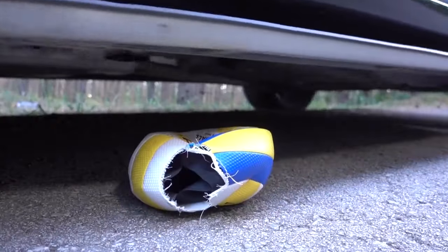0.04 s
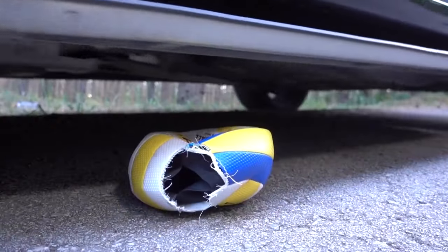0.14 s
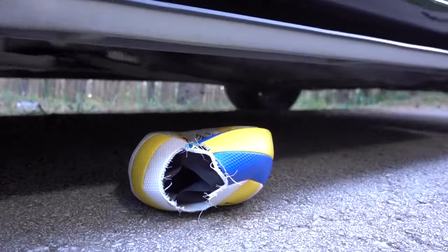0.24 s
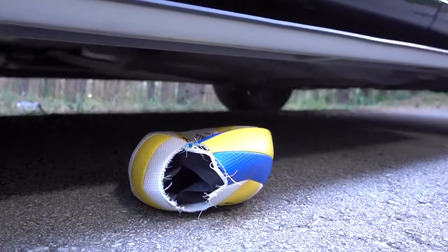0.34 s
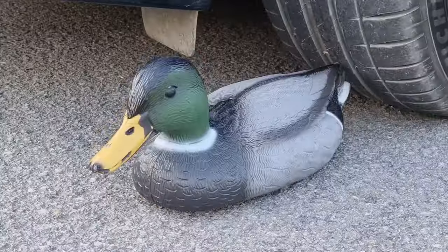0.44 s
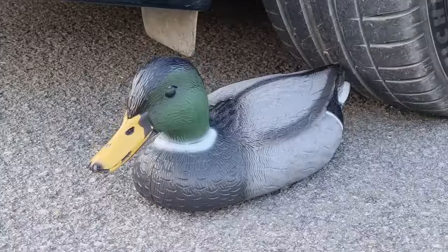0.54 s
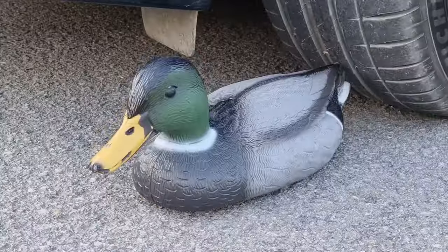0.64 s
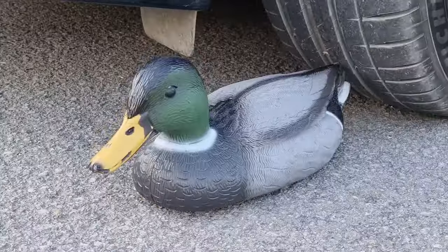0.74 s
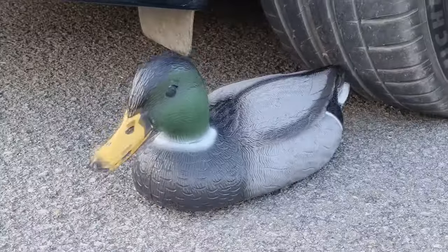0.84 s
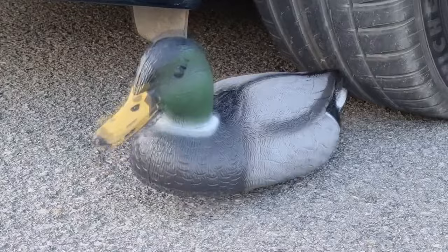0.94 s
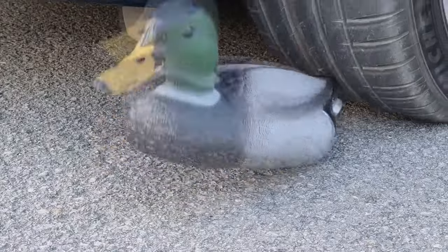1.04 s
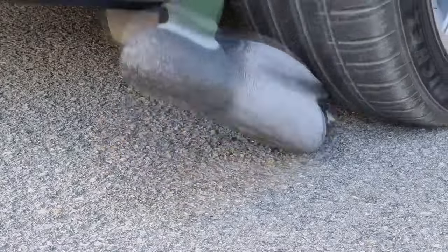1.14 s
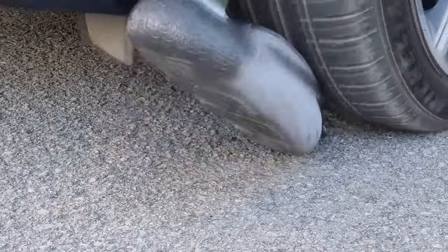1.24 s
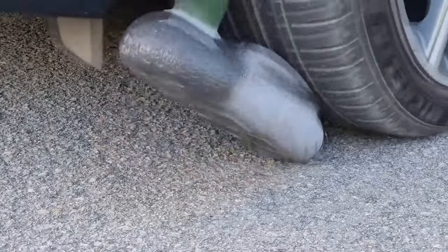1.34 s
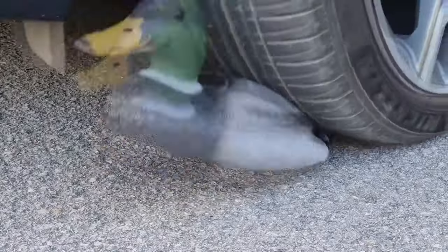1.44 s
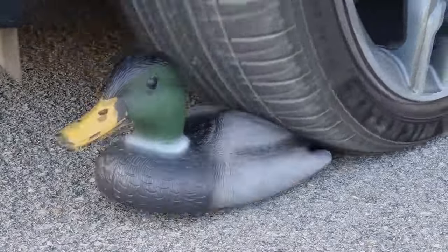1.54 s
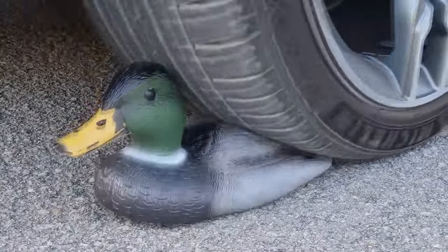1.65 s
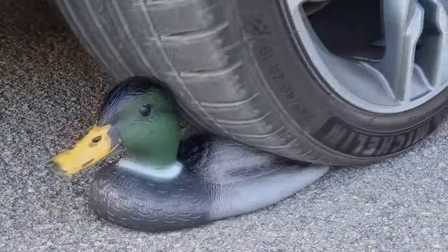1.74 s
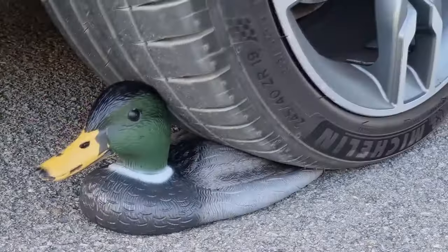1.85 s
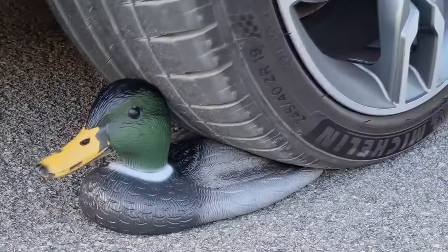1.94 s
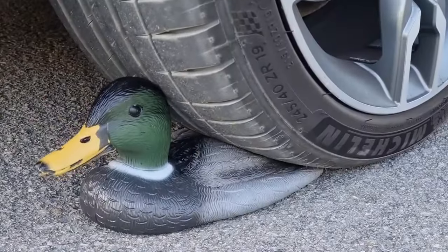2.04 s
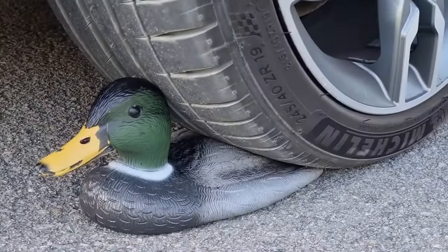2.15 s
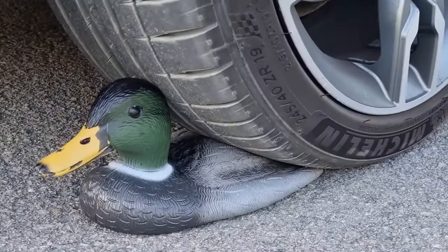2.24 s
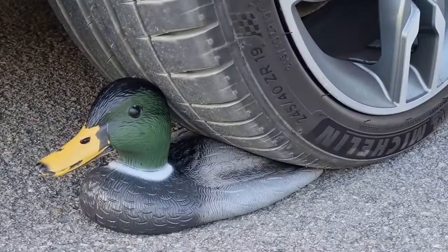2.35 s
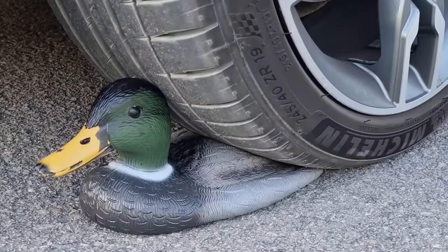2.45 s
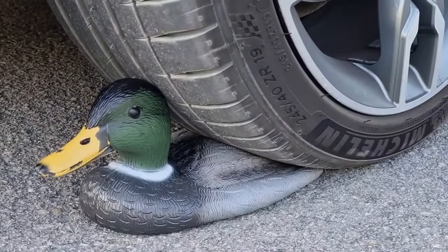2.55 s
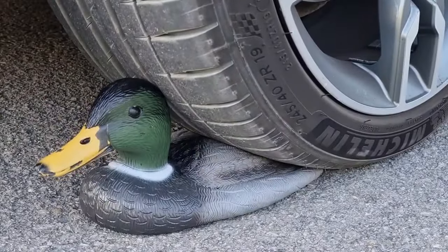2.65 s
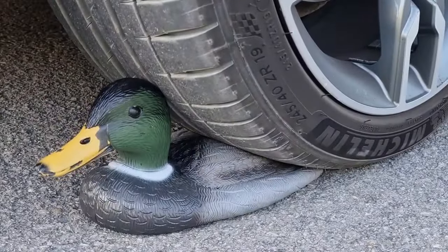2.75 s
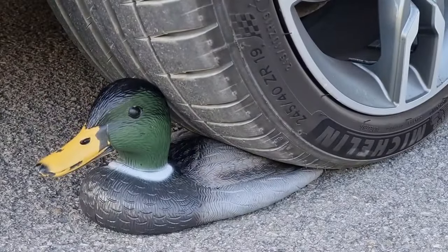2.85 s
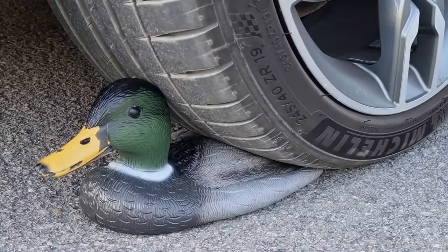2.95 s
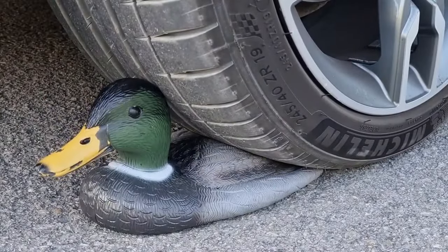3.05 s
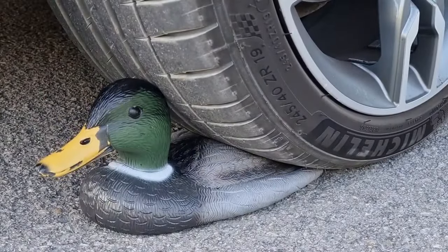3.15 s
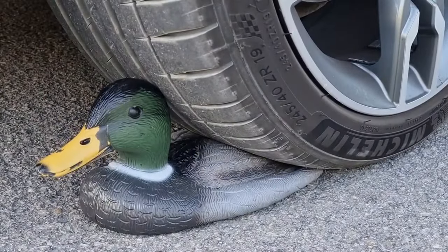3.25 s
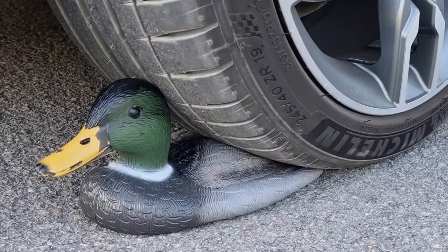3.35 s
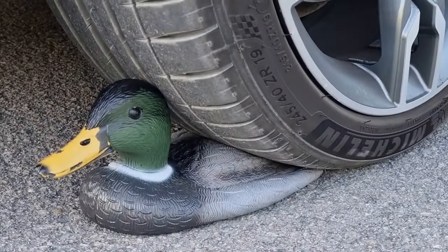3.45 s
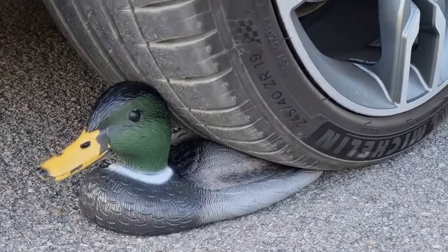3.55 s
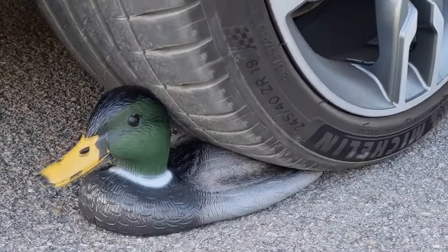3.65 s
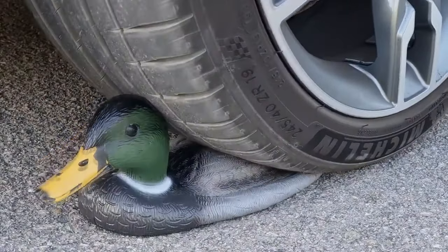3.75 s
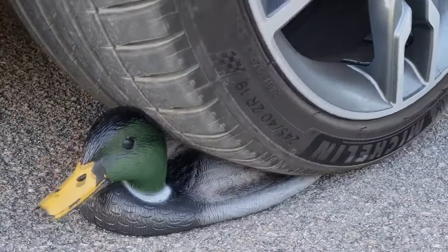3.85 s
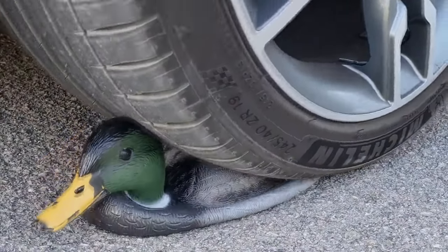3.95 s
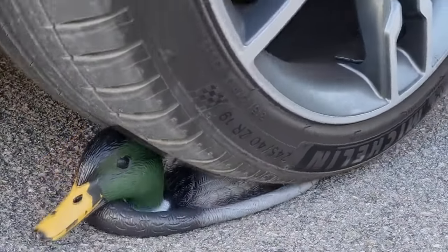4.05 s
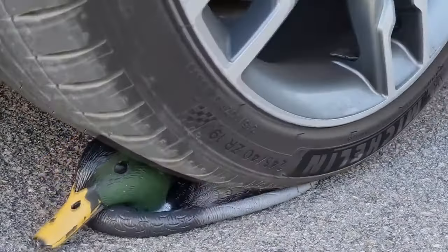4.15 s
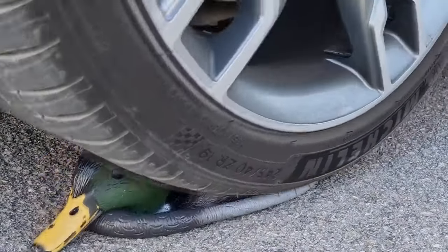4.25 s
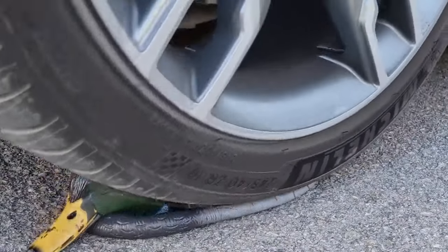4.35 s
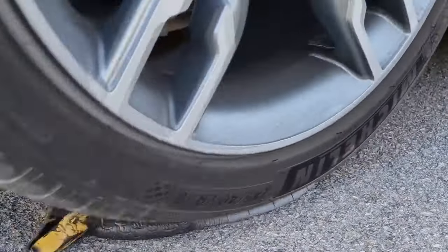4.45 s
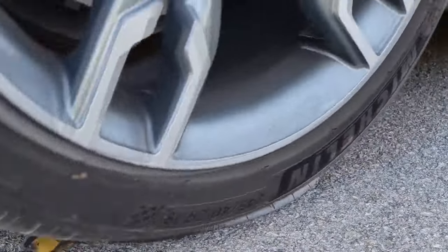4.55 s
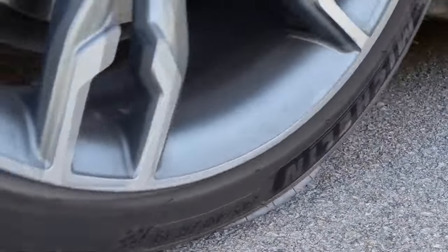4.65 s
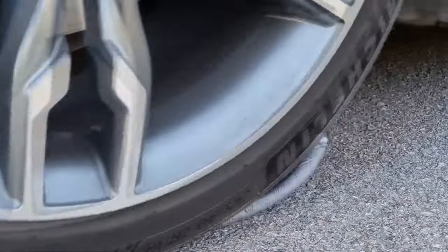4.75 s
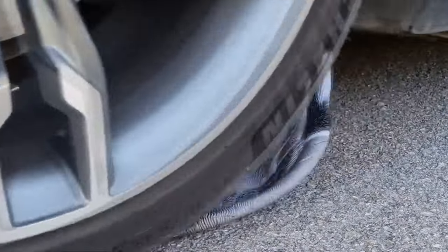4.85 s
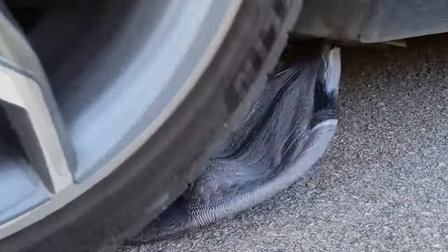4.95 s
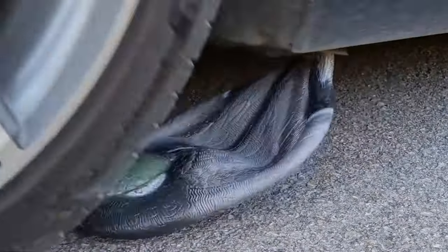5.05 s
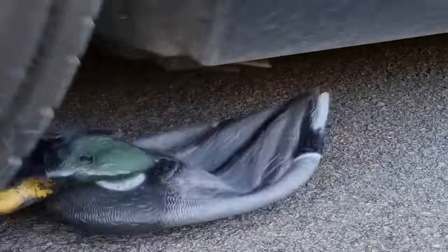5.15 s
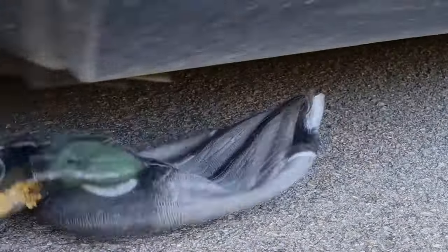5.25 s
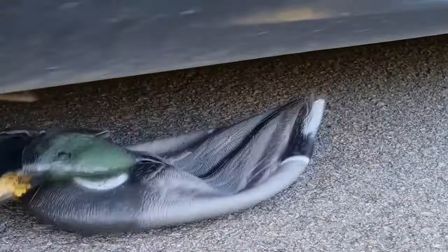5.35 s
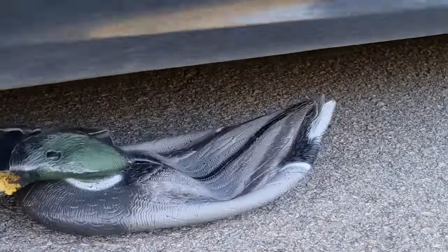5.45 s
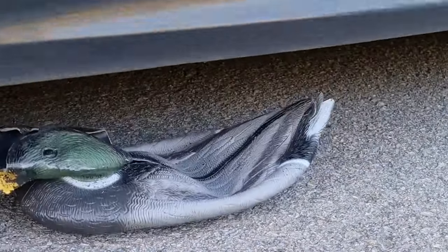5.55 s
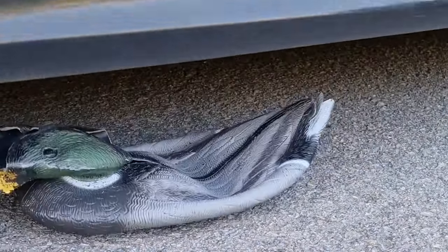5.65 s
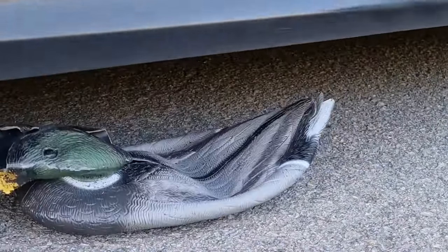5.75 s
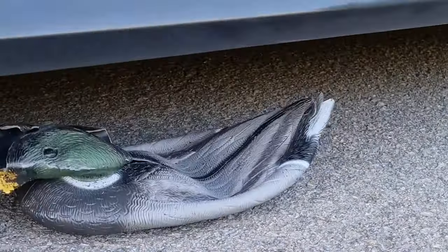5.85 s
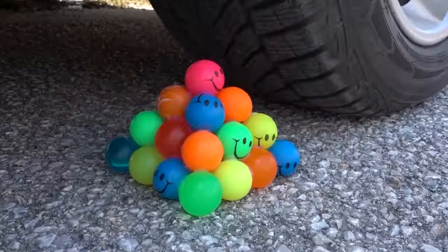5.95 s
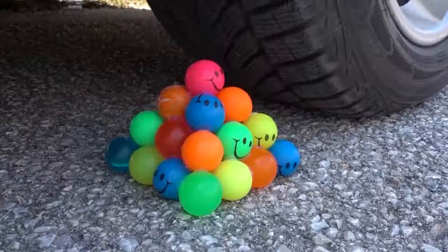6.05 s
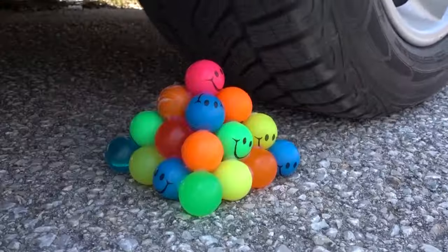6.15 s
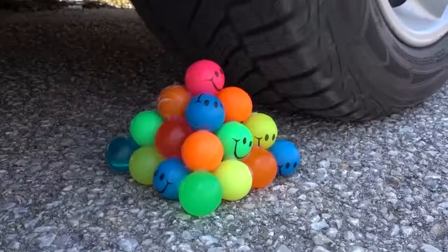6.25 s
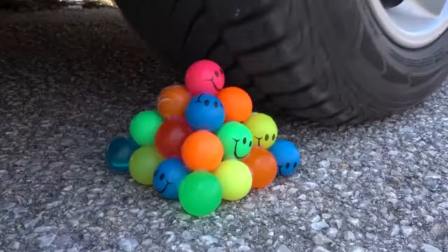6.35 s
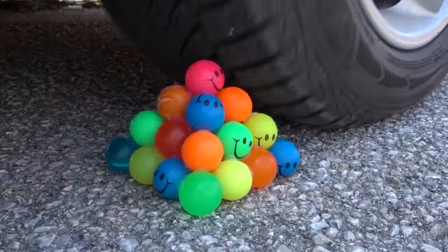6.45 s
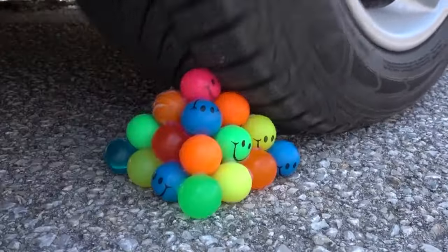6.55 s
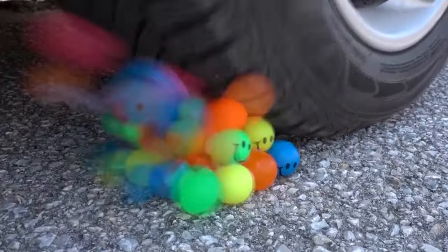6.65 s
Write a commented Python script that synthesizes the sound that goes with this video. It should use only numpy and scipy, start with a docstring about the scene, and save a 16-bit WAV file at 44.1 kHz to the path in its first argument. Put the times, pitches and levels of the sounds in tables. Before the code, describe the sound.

Close outdoor microphone near the road. Half a second of faint gritty tyre hiss cuts to low car rumble and plastic rubbing. A hollow plastic duck is tipped and squeezed with booming knocks, sharp cracks and a squeak; a quieter strained pause follows. Then the wheel climbs over it with loud snaps, hollow rings and thuds, and the flattened shell rattles lightly. A last cut brings quiet tyre grit and small balls tapping together.

```python
"""A gritty hiss of a car tyre on rough asphalt comes first, then a hollow plastic duck being run over, hard cut.
The duck's shell rubs, buckles and cracks: noise grains and sharp snaps drive resonances of air and wall.
Decaying sines make low hollow rings, short harmonic tones the squeaks; noise makes growls, rumble and thuds.
A last hard cut leads to a tyre creeping into a pile of small plastic balls, which scrape and knock together."""
import sys
import numpy as np
from scipy import signal
from scipy.fft import rfft, irfft, next_fast_len
from scipy.io import wavfile
from scipy.ndimage import map_coordinates

SR = 44100
rng = np.random.default_rng(int(sys.argv[2]) if len(sys.argv) > 2 else 0)


def master_out(mix):
    """Clip the mix to full scale and print it as 16-bit PCM to the path in sys.argv[1]."""
    frames = np.transpose(np.atleast_2d(mix))
    ceiling = np.clip(frames, -1, 1)
    pcm = np.round(ceiling * 32767).astype(np.int16)
    wavfile.write(sys.argv[1], SR, pcm)


N = 295470
TIME = np.arange(N) / SR
FIRST_CUT_S, SECOND_CUT_S = 0.515, 5.985

# The shell buckles or hits the road with a hollow knock; t60 is that of the driving chatter:
# start_s, hollow_hz, hollow_db, panel_hz, panel_db, crack_db, t60_s
SHELL_KNOCKS = [(1.179, 241, -41, 830, -44, -63, 0.065), (1.223, 220, -30, 710, -45.5, -63, 0.036),
                (1.318, 208, -28, 740, -41, -49.5, 0.79), (1.349, 190, -23.5, 572, -23.5, -32, 0.076),
                (1.664, 348, -21, 610, -30.5, -41.5, 0.033), (1.699, 400, -46, 634, -39, -40.5, 0.17),
                (1.748, 290, -41.5, 690, -35, -44.5, 0.025), (1.81, 256, -36.5, 530, -49, -64, 0.039),
                (1.837, 323, -39, 540, -43.5, -54, 0.024), (1.936, 243, -33.5, 630, -30.5, -40, 0.2),
                (4.056, 210, -43, 710, -44.5, -66, 0.031), (4.158, 388, -19.5, 644, -23.5, -41.5, 0.021),
                (4.2102, 485, -23.5, 575, -16, -39, 0.085), (4.701, 320, -40, 1030, -36, -46, 0.012),
                (5.069, 280, -27.5, 513, -33, -49, 0.13), (5.083, 191, -23, 460, -33.5, -49.5, 0.22),
                (5.135, 377, -34.5, 620, -36, -48.5, 0.22), (5.185, 241, -28, 760, -20.5, -40.5, 0.058),
                (5.203, 164, -30.5, 596, -25, -42.5, 0.24), (5.266, 276, -27.5, 684, -25, -43, 0.043)]
KNOCK_TREBLE_DB = -10  # relative to the crack
# The plastic splits; t60 is that of the driving chatter:
# start_s, crack_db, crack_pitch_ratio, tear_to_snap_ratio, treble_db, panel_hz, panel_db, t60_s
SHELL_CRACKS = [(1.418, -30.5, 1.23, 0.47, -41, 1800, -59, 0.011),
                (1.523, -21.5, 1.16, 0.53, -26.5, 720, -26.5, 0.027),
                (1.5643, -29, 0.79, 0.83, -31, 657, -21.5, 0.018),
                (1.601, -42, 1.1, 1.2, -35.5, 875, -61, 0.047),
                (2.443, -73, 1.5, 5, -59.5, 850, -58, 0.036),
                (3.8733, -21.5, 0.92, 1.2, -37, 1290, -23.5, 0.02),
                (4.2055, -32, 1.14, 4.2, -33.5, 553, -23.5, 0.056),
                (4.565, -18.5, 0.79, 2.1, -25, 1150, -16.5, 0.014),
                (4.8266, -45.5, 0.81, 1.1, -60, 714, -50, 0.029),
                (4.927, -36.5, 0.78, 0.58, -53.5, 810, -33.5, 0.042),
                (5.26, -32.5, 0.76, 0.88, -45, 650, -30, 0.041),
                (5.797, -52, 1.37, 3, -65, 870, -64, 0.0083)]
CRACK_HOLLOW_HZ, CRACK_HOLLOW_DB = 280, -8.5  # level relative to the panel
# The freed wreck rocks and taps the road: start_s, panel_hz, panel_db, crack_db
WRECK_TAPS = [(5.356, 585, -28, -38.5), (5.385, 620, -34.5, -47), (5.42, 596, -34, -46),
              (5.445, 645, -44.5, -68), (5.504, 487, -33, -47), (5.534, 480, -38, -57),
              (5.566, 675, -38.5, -56.5), (5.601, 554, -37.5, -68), (5.632, 680, -41, -54.5),
              (5.657, 740, -43, -60.5)]
TAP_HOLLOW_HZ, TAP_HOLLOW_DB = 313, -4  # level relative to the panel
TAP_TREBLE_DB, TAP_T60_S = -16.5, 0.058  # treble relative to the crack
HIT_S = .03  # each part of a hit has its energy stated as rms over this time
# Spectrum of a crack before its pitch ratio: pitch_hz, relative_level_db
CRACK_COLOUR = [(700, -47.5), (1600, 17), (3500, 20.5), (5000, 13), (7000, 0), (12000, -67)]
# Spectrum of the finest treble: pitch_hz, relative_level_db
FINE_HISS_COLOUR = [(2500, -8.5), (6500, -4.5), (10000, -9.5), (13000, -6), (16000, -8.5)]
# The dented body rings after a knock: pitch_hz, width_hz, level_db
BODY_RING_MODES = [(400, 100, -2.5), (691, 34, -8)]
# The split wall rings on: pitch_hz, width_hz, level_db
WALL_RING_MODES = [(1748, 86, 4.5), (2760, 12, -16.5), (3320, 12, -10), (3830, 56, -25.5), (6270, 390, -2)]

# The duck slides over grit: start_s, hold_s, rub_db, crunch_db
DUCK_SLIDES = [(0.706, 0.18, -44.5, -64.5), (1.073, 0.078, -48, -62.5), (1.193, 0.016, -46, -48),
               (1.521, 0.072, -35.5, -35), (1.668, 0.31, -41.5, -47), (2.143, 0.025, -44.5, -46),
               (2.374, 0.066, -57, -71), (2.79, 0.074, -56.5, -61.5), (3.502, 0.037, -42.5, -45),
               (3.648, 0.039, -54, -59.5), (4.031, 0.23, -53, -51.5)]
SLIDE_ATTACK_S, SLIDE_RELEASE_S = 0.044, 0.036  # time for 20 dB
SLIDE_HISS_DB = -10  # relative to the crunch
SLIP_UNEVEN_DB, SLIP_UNEVEN_PER_S = 2, 6.8  # the shell catches and lets go as it slides
# Short and longer swells of fine hiss: start_s, hold_s, level_db
HISS_SWELLS = [(1.41, 0.48, -47.5), (3.86, 0.023, -47), (4.06, 0.3, -58), (4.45, 0.27, -54)]
# The tread scrubs the dented body along in coarse jerks: start_s, hold_s, level_db
TREAD_SCRUBS = [(2.378, .085, -45), (3.505, 0.063, -38)]
# Shell resonances: pitch_hz, width_hz, level_db
SHELL_MODES = [(424, 98, -1.5), (710, 88, 1), (937, 110, -3), (1200, 190, 5.5), (1750, 81, 8),
               (2810, 160, 8)]
SMEAR_T60_S = .035
FLEX_SHARE, FLEX_PER_S = .03, 4  # how far and how fast the shell's resonances wander as it bends
# Spectrum of shell rubbing on road: pitch_hz, relative_level_db
RUB_COLOUR = [(120, -14.5), (220, 9.5), (420, 9), (650, 3), (1000, -0.5), (2000, -7), (3600, -18.5),
              (5000, -72.5)]
# Spectrum of grit crunching under the shell: pitch_hz, relative_level_db
CRUNCH_COLOUR = [(700, -39.5), (1500, 5.5), (3300, 9.5), (5500, -1.5), (15000, -33)]
# Spectrum of the tread straining on the asphalt: pitch_hz, relative_level_db
TREAD_COLOUR = [(300, 5), (850, 2), (1600, -5), (3400, -12.5), (7000, -30)]
# Hollow low growls of noise, one long, one very short: start_s, hold_s, level_db
HOLLOW_GROWLS = [(1.19, 0.24, -34.5), (1.53, 0.035, -37.5)]
GROWL_ATTACK_S, GROWL_RELEASE_S = .13, 0.02  # time for 20 dB
# Hollow resonances of the growl: pitch_hz, width_hz, level_db
GROWL_MODES = [(208, 14, 12.5), (418, 67, -1.5), (740, 145, -9.5)]
# Where the duck lies as it is shoved about: time_s, left_minus_right_db
DUCK_PAN = [(.85, 0.5), (1.38, -1), (1.55, 0), (4.6, -0.5), (4.93, -0.5), (5.9, -2)]

# Rubber slips on grit or plastic; pitch is mid-slip:
# start_s, length_s, pitch_hz, pitch_unsteadiness_share, step_per_overtone_db, level_db
RUBBER_SQUEAKS = [(0.277, 0.051, 867, 0.21, -9, -43), (0.682, 0.25, 433.7, 0.039, -3, -52),
                  (1.509, 0.026, 3300, 0.16, 10, -22.5), (2.133, 0.079, 1200, 0.023, -18, -49),
                  (2.139, 0.11, 602, 0.032, -6, -51), (3.103, 0.036, 2740, 0.5, -1, -63),
                  (3.164, 0.014, 1270, 0.22, -7.5, -58), (3.272, 0.04, 1070, 0.3, -5, -53),
                  (3.404, 0.028, 4200, 0.21, -10.5, -53.5), (3.674, 0.022, 1250, 0.347, -6, -52.5),
                  (4.196, 0.018, 3483, 0.385, -6, -24), (4.545, 0.033, 3260, 0.12, -4, -32),
                  (6.248, 0.031, 2700, 0.035, -6, -46.5), (6.624, 0.024, 2085, 0.134, -6, -41)]
# Low hollow tones ring and decay; level is before decay: start_s, level_db, t60_s
LOW_RINGS = [(1.316, -13, 0.25), (4.214, -26.5, 0.42), (4.612, -23.5, 0.55), (5.186, -21, 0.27)]
LOW_RING_HZ, LOW_RING_ATTACK_S = 210, .008
# A faint, wavering higher hollow tone lingers and dies away; level is before decay: # start_s, level_db, t60_s
HIGH_HUMS = [(4.22, -48.5, 1.7), (4.6, -46.5, 1.55)]
HUM_HZ = 614

# The balls shift and knock; t60 is that of the driving chatter: start_s, pitch_hz, knock_db, click_db, t60_s
BALL_KNOCKS = [(5.986, 424, -43, -70.5, 0.079), (6.254, 458, -36, -56, 0.046),
               (6.335, 740, -38, -37.5, 0.08), (6.421, 900, -39, -46.5, 0.27),
               (6.457, 885, -42, -47, 0.051), (6.5045, 825, -36, -42, 0.033), (6.528, 533, -37, -59, 0.079),
               (6.556, 1120, -37.5, -46.5, 0.073), (6.572, 815, -49, -56, 0.041),
               (6.587, 760, -38.5, -46, 0.017), (6.632, 1440, -39.5, -65, 0.013)]
BALL_HOLLOW_HZ, BALL_HOLLOW_DB = 378, -8  # level relative to the knock
BALL_TREBLE_DB = -11  # relative to the click
# Ball resonances: pitch_hz, width_hz, level_db
BALL_MODES = [(760, 40, 6), (2580, 250, -25)]
# The pile scrapes along the road: start_s, hold_s, level_db
PILE_SHOVES = [(6.53, 0.032, -38)]
# Spectrum of grit under tread and balls: pitch_hz, relative_level_db
GRIT_COLOUR = [(200, -7.5), (800, 7.5), (3200, -3), (12000, -45.5)]
# The tyre slows as it nears the balls: time_s, rumble_db, grit_db, hiss_db
BALL_ROLL = [(6.0, -37, -63.5, -67), (6.1, -42.5, -62, -70.5), (6.3, -46.5, -53, -65.5),
             (6.39, -59, -54.5, -55.5), (6.7, -53, -54.5, -53.5)]
# Spectrum of that rolling rumble: pitch_hz, relative_level_db
ROLL_COLOUR = [(25, -13.5), (120, 3.5), (300, -8.5), (1200, -29.5), (3000, -54)]

# The car's low rumble and the grit straining under its tread: time_s, rumble_db, grit_db
CAR_LEVELS = [(.55, -39, -73.5), (.68, -47.5, -64), (.97, -41, -58), (1.5, -44, -46.5), (2.05, -36, -52.5),
              (2.3, -37.5, -55.5), (3.0, -34, -73), (3.38, -39, -60.5), (3.75, -30, -54.5),
              (4.4, -46.5, -55.5), (4.75, -39.5, -52), (5.0, -55.5, -52.5), (5.45, -46.5, -43),
              (5.95, -46, -55.5)]
GRIT_HISS_DB = -21.5  # relative to the grit level
RUMBLE_UNEVEN_DB, RUMBLE_UNEVEN_PER_S = 2, 7
# Spectrum of the car's rumble: pitch_hz, relative_level_db
RUMBLE_COLOUR = [(22, -6.5), (45, 2.5), (80, 7.5), (130, -2), (280, -20), (1000, -56.5)]
# Soft low thuds and swells of low noise: start_s, hold_s, level_db
LOW_THUDS = [(.92, 0.065, -43), (1.35, 0.045, -44), (1.94, 0.08, -29), (3.5, 0.02, -36.5),
             (4.572, 0.027, -21.5), (5.075, 0.018, -35), (5.205, 0.019, -21.5)]
THUD_ATTACK_S, THUD_RELEASE_S = 0.034, 0.057  # time for 20 dB
# Spectrum of the thuds: pitch_hz, relative_level_db
THUD_COLOUR = [(22, -9), (45, -7), (85, 9.5), (140, -2), (280, -13), (1000, -59.5)]
# Spectrum of the opening roll: pitch_hz, relative_level_db
OPENING_COLOUR = [(25, -38), (85, -12.5), (140, -18.5), (220, -10), (850, -18), (6000, -30), (14000, -31),
                  (16000, -39)]
OPENING_DB = -40
# How alike left and right are, from -1 opposite to 1 identical: pitch_hz, likeness
STEREO_LIKENESS = [(30, -0.14), (160, 0.94), (350, 0.85), (800, 0.43), (2000, 0.12), (12000, -0.3)]
CUTOFF_HZ = 16000


def knocks():
    """Dull blows: mostly enclosed air and panel, with a short ring of the body."""
    rows = [(s, hollow_hz, hollow_db, panel_hz, panel_db, crack_db, crack_db + KNOCK_TREBLE_DB, t60)
            for s, hollow_hz, hollow_db, panel_hz, panel_db, crack_db, t60 in SHELL_KNOCKS]
    blows = hits(rows, scatter=1.0, crack_scatter=6.1, hollow_width=0.44, panel_width=0.26, crack_life=0.76)
    return blows + resonances(blows, BODY_RING_MODES)


def cracks():
    """Sharp splits, from one clean snap to a ragged tear, that leave the wall ringing."""
    splits = np.zeros((2, N))
    for s, crack_db, pitch, ragged, treble_db, panel_hz, panel_db, t60 in SHELL_CRACKS:
        hollow_db = panel_db + CRACK_HOLLOW_DB
        row = (s, CRACK_HOLLOW_HZ, hollow_db, panel_hz, panel_db, crack_db, treble_db, t60)
        splits += hits([row], scatter=0.92, crack_scatter=ragged, hollow_width=0.97, panel_width=0.31,
                       crack_life=1.0, crack_pitch=pitch)
    return splits + resonances(splits, WALL_RING_MODES)


def rocking():
    """The freed wreck taps the road: each tap drives its air and panel, with a very short crack."""
    rows = [(s, TAP_HOLLOW_HZ, panel_db + TAP_HOLLOW_DB, panel_hz, panel_db,
             crack_db, crack_db + TAP_TREBLE_DB, TAP_T60_S)
            for s, panel_hz, panel_db, crack_db in WRECK_TAPS]
    return hits(rows, scatter=1.1, crack_scatter=3, hollow_width=0.27, panel_width=0.36, crack_life=0.23)


def hits(rows, scatter, crack_scatter, hollow_width, panel_width, crack_life, crack_pitch=1):
    """A wall snaps over and chatters to rest; this drives the enclosed air, the panel and a bright crack."""
    out, t = np.zeros((2, N)), TIME[:SR // 4]
    crack_colour = np.multiply(CRACK_COLOUR, [crack_pitch, 1])
    for s, hollow_hz, hollow_db, panel_hz, panel_db, crack_db, treble_db, t60 in rows:
        chatter = spread(rng.standard_normal((2, len(t))) * from_db(2.7 * drift(170, size=len(t))))
        snap = np.zeros((2, len(t)))
        snap[0, 0] = snap[1, 2] = np.sqrt(len(t))  # the right side comes two samples later
        # the push moves the whole wall; the tear is its sharper, more ragged part
        push = snap + scatter * rms_one(chatter * from_db(-60 * t / t60))
        tear = snap + crack_scatter * rms_one(chatter * from_db(-60 * t / (t60 * crack_life)))
        hollow = resonance(push, hollow_hz, hollow_width * hollow_hz)
        hollow = band(hollow, 0.12 * hollow_hz, 1.12 * hollow_hz)
        panel = resonance(push, panel_hz, panel_width * panel_hz)
        panel = band(panel, 0.31 * panel_hz, 1.85 * panel_hz)
        crack = coloured(tear, crack_colour)
        treble = coloured(tear, FINE_HISS_COLOUR)
        parts = [(hollow, hollow_db), (panel, panel_db), (crack, crack_db), (treble, treble_db)]
        hit = sum(from_db(db) * rms_one(part) for part, db in parts)
        add(out, s, hit * np.sqrt(HIT_S / t[-1]))
    return out


def friction():
    """Uneven slips shake the shell as it rubs; grit crunches and hisses under shell and tread."""
    _, road = gains_in_time(CAR_LEVELS)
    rub, crunch, hiss = friction_gains()
    slips = grains(per_s=700, size_db=4.0, smooth=.6)
    shell = rms_one(flexing(resonances(smeared(slips), SHELL_MODES)))
    smeared_rub = flexing(smeared(slips))
    grit = grains(per_s=600, size_db=3.2, smooth=.9)
    fine_grit = grains(per_s=5000, size_db=1, smooth=0.3)
    catching = rms_one(from_db(SLIP_UNEVEN_DB * drift(SLIP_UNEVEN_PER_S)))
    sound = catching * rub * coloured(2.2 * smeared_rub + shell, RUB_COLOUR)
    sound += crunch * coloured(grit + 0.25 * shell, CRUNCH_COLOUR)
    sound += scrubs()
    sound += road * coloured(grit, TREAD_COLOUR)
    hiss = np.hypot(hiss, from_db(GRIT_HISS_DB) * road)  # the two hisses add as power
    return sound + hiss * coloured(fine_grit, FINE_HISS_COLOUR)


def friction_gains():
    """Rub and crunch gains of the slides, and the hiss gain of slides and hiss swells."""
    rub_rows = [(s, hold, db) for s, hold, db, _ in DUCK_SLIDES]
    crunch_rows = [(s, hold, db) for s, hold, _, db in DUCK_SLIDES]
    rub = swells(rub_rows, SLIDE_ATTACK_S, SLIDE_RELEASE_S)
    crunch = swells(crunch_rows, SLIDE_ATTACK_S, SLIDE_RELEASE_S)
    hiss_swells = swells(HISS_SWELLS, attack_s=0.067, release_s=0.095)
    return rub, crunch, from_db(SLIDE_HISS_DB) * crunch + hiss_swells


def scrubs():
    """Sparse, uneven slips, smeared and coloured like the rub."""
    jerks = band(smeared(grains(per_s=400, size_db=2.5, smooth=.2)), 290, 3600)
    return swells(TREAD_SCRUBS, SLIDE_ATTACK_S, SLIDE_RELEASE_S) * coloured(jerks, RUB_COLOUR)


def smeared(x):
    """A short burst of decaying noise smears the rub and colours it."""
    t = TIME[:SR // 8]
    burst = rng.standard_normal(len(t)) * from_db(-60 * t / SMEAR_T60_S)
    return rms_one(signal.oaconvolve(x, burst[None], axes=1)[:, :N])


def flexing(x):
    """All resonances of a steady sound wander together as the shell bends: it is read at a varying speed."""
    place = np.cumsum(1 + FLEX_SHARE * drift(FLEX_PER_S)) % (N - 1)
    return np.array([map_coordinates(side, [place], mode="nearest") for side in x])


def growls():
    """Hollow low growls: noise through a few low resonances."""
    hollow = resonances(spread(rng.standard_normal((2, N))), GROWL_MODES)
    return swells(HOLLOW_GROWLS, GROWL_ATTACK_S, GROWL_RELEASE_S) * rms_one(band(hollow, 110, 890))


def squeaks(flutter_db, sag):
    """Stick-slip gives a short harmonic tone that sags as the strain eases; when very unsteady, a scuff."""
    out = np.zeros((2, N))
    for s, length, hz, unsteady, overtone_db, db in RUBBER_SQUEAKS:
        size = int(length * SR)
        wobble, flutter = drift(740, size=SR)[:size], drift(80, size=SR)[:size]
        sagging_hz = hz * np.linspace(1 + sag, 1 - sag, size)
        phase = 2 * np.pi * np.cumsum(sagging_hz * (1 + unsteady * wobble + .012 * flutter)) / SR
        # the left-right phase difference of a partial grows with its pitch
        partials = [from_db(overtone_db * k) * np.sin(k * phase + k * hz / 4500 * np.array([[1], [-1]]))
                    for k in range(1, 7) if k == 1 or k * hz < 4000]
        tone = sum(partials) * from_db(flutter_db * flutter) * signal.windows.tukey(size, .7)
        add(out, s, from_db(db) * rms_one(tone))
    return out


def hollow_rings():
    """Low hollow tones ring and decay as sines; a higher hollow tone wavers and dies away."""
    out, t = np.zeros((2, N)), TIME[:SR]
    ring = np.sin(2 * np.pi * LOW_RING_HZ * t) * np.minimum(t / LOW_RING_ATTACK_S, 1)
    for s, db, t60 in LOW_RINGS:
        add(out, s, from_db(db - 60 * t / t60) * ring)
    for s, db, t60 in HIGH_HUMS:
        hum = np.sin(2 * np.pi * HUM_HZ * t + .5 * drift(19, size=SR))
        hum = rms_one(hum * from_db(2 * drift(22, size=SR)))
        add(out, s, from_db(db - 60 * t / t60) * hum)
    return out


def car_rumble():
    """Low noise for the car's rumble swells unevenly; the same noise makes soft low thuds and swells."""
    car, _ = gains_in_time(CAR_LEVELS)
    lumps = rms_one(from_db(RUMBLE_UNEVEN_DB * drift(RUMBLE_UNEVEN_PER_S)))
    low_noise = spread(rng.standard_normal((2, N)))
    thuds = swells(LOW_THUDS, THUD_ATTACK_S, THUD_RELEASE_S)
    return car * lumps * coloured(low_noise, RUMBLE_COLOUR) + thuds * coloured(low_noise, THUD_COLOUR)


def crushed_duck():
    """Buckling shell, growls and friction on grit, with hollow rings, echoes and the rumble of the car."""
    blows = knocks() + cracks() + rocking()
    left, = gains_in_time(DUCK_PAN)
    duck = (blows + friction() + growls()) * np.sqrt([left, 1 / left])
    echoes = from_db(-12.0) * underbody(blows, t60=0.079) + from_db(-27) * underbody(blows, t60=0.33)
    return duck + hollow_rings() + echoes + car_rumble()


def ball_taps():
    """Small hollow balls knock together: air, wall and a click for each contact."""
    rows = [(s, BALL_HOLLOW_HZ, db + BALL_HOLLOW_DB, hz, db, click_db, click_db + BALL_TREBLE_DB, t60)
            for s, hz, db, click_db, t60 in BALL_KNOCKS]
    return hits(rows, scatter=1.15, crack_scatter=5.6, hollow_width=0.5, panel_width=0.55, crack_life=1.0)


def nudged_balls():
    """The tread rolls on grit and nudges the pile, which scrapes, taps and resonates."""
    rumble, grit, hiss = gains_in_time(BALL_ROLL)
    road = rumble * coloured(spread(rng.standard_normal((2, N))), ROLL_COLOUR)
    road += hiss * rms_one(band(rng.standard_normal((2, N)), 2240, 11000))
    shove = swells(PILE_SHOVES, attack_s=0.076, release_s=0.091)
    scrape = (grit + shove) * coloured(grains(per_s=900, size_db=5.0, smooth=0.5), GRIT_COLOUR)
    pile = (scrape + ball_taps()) * panned(1.9)
    ring = from_db(-17.0) * resonances(pile, BALL_MODES)
    return road + pile + ring + from_db(-13.5) * underbody(pile, t60=0.13)


def opening_roll():
    """A steady gritty hiss of the car creeping over asphalt: dense grains over smooth noise."""
    return from_db(OPENING_DB) * coloured(grains(per_s=1500, size_db=2.5, smooth=2), OPENING_COLOUR)


def underbody(x, t60):
    """Short, dull reflections between road and car floor, as decaying noise."""
    t = TIME[:SR // 3]
    echoes = band(rng.standard_normal((2, len(t))), 120, 10000)
    echoes = echoes * from_db(-60 * t / t60) * (t > .004)  # silent for the first 4 ms
    return signal.oaconvolve(x, rms_one(spread(echoes)) / np.sqrt(len(t)), axes=1)[:, :N]


def grains(per_s, size_db, smooth):
    """Clumped slips of uneven size over a share of smooth friction noise."""
    born = rng.random(N) < per_s * from_db(4 * drift(25)) / SR
    sizes = born * from_db(size_db * np.minimum(rng.exponential(1, N), 3.5))
    slips = rms_one(sizes * rng.standard_normal((2, N)))
    return rms_one(spread(slips + smooth * rng.standard_normal((2, N))))


def resonances(x, modes):
    """What a hollow body's modes give back, signs alternating."""
    return sum((-1) ** k * from_db(db) * resonance(x, hz, width) for k, (hz, width, db) in enumerate(modes))


def resonance(x, hz, width_hz):
    """Two-pole resonance with gain close to 1 on top."""
    r = np.exp(-np.pi * width_hz / SR)
    zeros = np.array([1, 0, -1]) * (1 - r * r) / 2
    return signal.lfilter(zeros, [1, -2 * r * np.cos(2 * np.pi * hz / SR), r * r], x)


def band(x, low_hz, high_hz):
    """Gentle band-pass."""
    edges = [low_hz, min(high_hz, .45 * SR)]
    return signal.sosfilt(signal.butter(2, edges, "band", fs=SR, output="sos"), x)


def coloured(x, spectrum):
    """Causal (minimum-phase) filter with the given spectrum, then rms 1."""
    size = 2048
    log_gain = at_hz(spectrum, np.arange(size + 1) * SR / (2 * size)) * np.log(10) / 20
    cepstrum = irfft(log_gain)
    cepstrum[1:size] *= 2  # folding the cepstrum forward makes the filter minimum-phase
    cepstrum[size + 1:] = 0
    response = irfft(np.exp(rfft(cepstrum)))
    return rms_one(signal.oaconvolve(x, response[None], axes=1)[:, :x.shape[1]])


def spread(pair):
    """Two unrelated signals become left and right: alike in the low mids, apart in the treble."""
    size = next_fast_len(pair.shape[1])
    mid, side = rfft(pair, size)
    alike = np.clip(at_hz(STEREO_LIKENESS, np.arange(len(mid)) * SR / size), -.99, .99)
    sides = np.sqrt(1 + alike) * mid + np.sqrt(1 - alike) * side * [[1], [-1]]
    return irfft(sides, size)[:, :pair.shape[1]] / np.sqrt(2)


def leaning(x, hz, width_hz, db):
    """Around one pitch the left is louder than the right by db (negative: quieter)."""
    return x + (panned(db) - 1) * resonance(x, hz, width_hz)


def panned(db):
    """Left and right gains that differ by db."""
    return from_db(np.array([[db], [-db]]) / 2)


def swells(rows, attack_s, release_s):
    """Summed gain of (start, hold, dB) events; each moves 20 dB in the attack and release times."""
    gain = 0
    for s, hold, db in rows:
        away = np.maximum((s - TIME) / attack_s, (TIME - s - hold) / release_s)
        gain = gain + from_db(db - 20 * np.clip(away, 0, 10))
    return gain


def gains_in_time(rows):
    """One gain curve for each dB column."""
    s, *columns = np.transpose(rows)
    return [from_db(np.interp(TIME, s, c)) for c in columns]


def drift(rate, size=N):
    """Smooth chance with spread near 1, made at a fortieth of the sample rate."""
    r = np.exp(-80 * np.pi * rate / SR)
    noise = rng.standard_normal(size // 40 + 2002)
    slow = signal.lfilter([1], [1, -2 * r, r * r], noise)[2000:]  # skip the filter's start
    return np.interp(np.arange(size) / 40, np.arange(len(slow)), rms_one(slow))


def at_hz(points, hz):
    """Read a table on a log-frequency axis."""
    points = np.array(points)
    return np.interp(np.log(hz + 1), np.log(points[:, 0]), points[:, 1])


def from_db(db):
    """Decibels to gain."""
    return 10 ** (np.asarray(db) / 20)


def rms_one(x):
    """Scale to rms 1."""
    return x / np.sqrt(np.mean(x ** 2) + 1e-20)


def add(out, s, sound):
    """Mix a sound in at time s."""
    start = int(round(s * SR))
    out[:, start:start + sound.shape[-1]] += sound[..., :N - start]


def scene():
    """Opening roll, crushed duck and nudged balls follow each other with hard cuts; squeaks run through all."""
    squeals = squeaks(flutter_db=3.0, sag=0.029)
    opening = opening_roll() + squeals
    duck = leaning(crushed_duck() + squeals, hz=3300, width_hz=790, db=-4.0)
    balls = leaning(nudged_balls() + squeals, hz=2360, width_hz=2700, db=8.0)
    return np.where(TIME < FIRST_CUT_S, opening, np.where(TIME < SECOND_CUT_S, duck, balls))


def record(dry):
    """The highest peaks are rounded and the top is cut."""
    rounded = 1.2 * np.tanh(dry / 1.2)
    return signal.sosfilt(signal.ellip(10, .2, 80, CUTOFF_HZ, fs=SR, output="sos"), rounded)


dry = scene()
out = record(dry)
master_out(out)
```